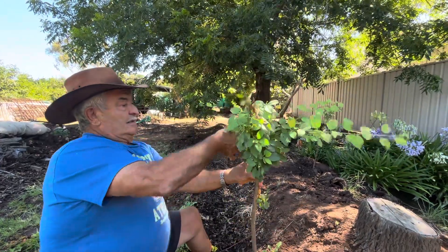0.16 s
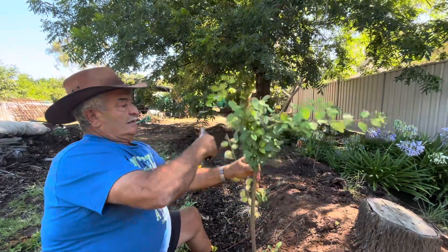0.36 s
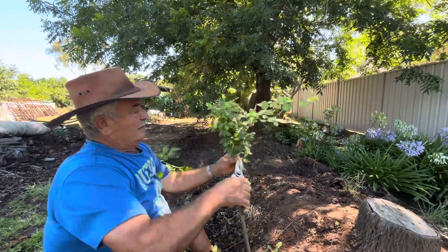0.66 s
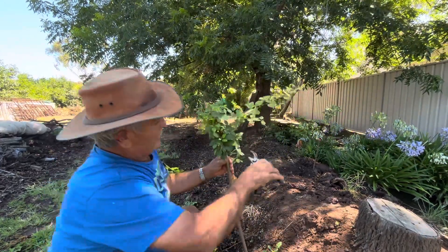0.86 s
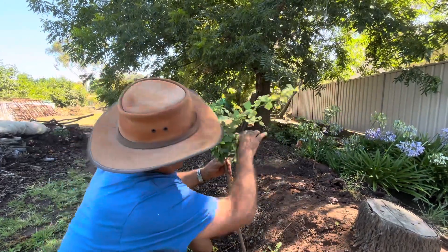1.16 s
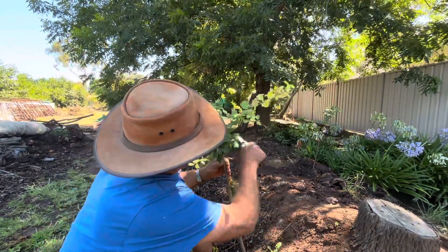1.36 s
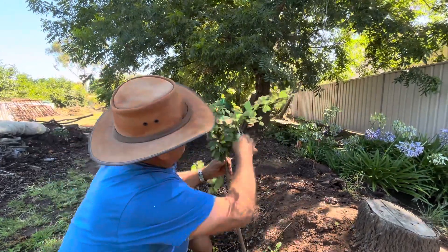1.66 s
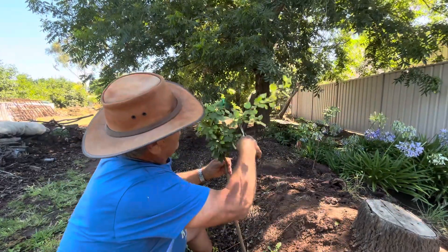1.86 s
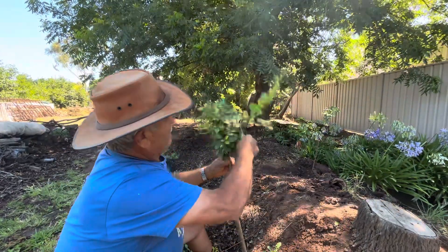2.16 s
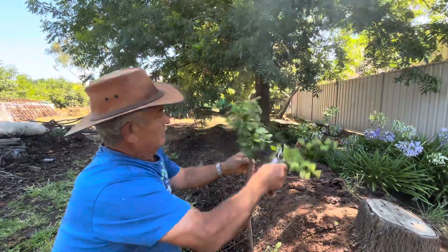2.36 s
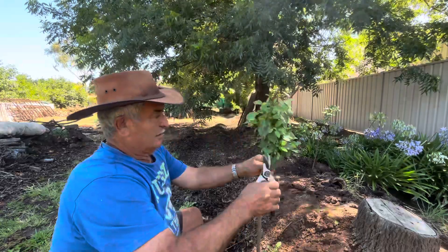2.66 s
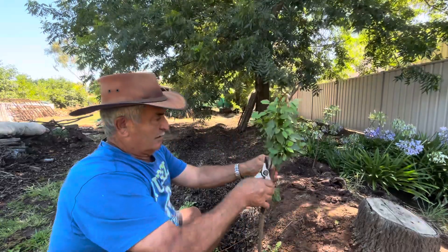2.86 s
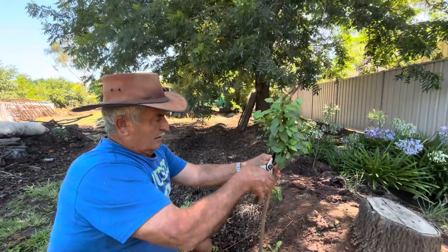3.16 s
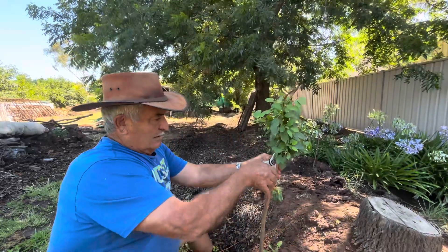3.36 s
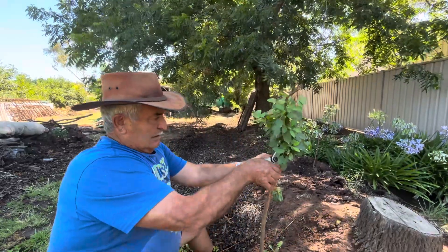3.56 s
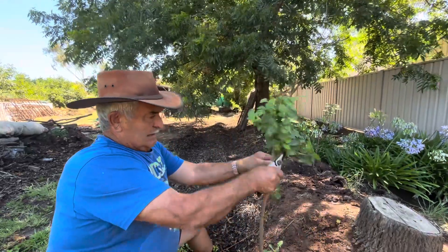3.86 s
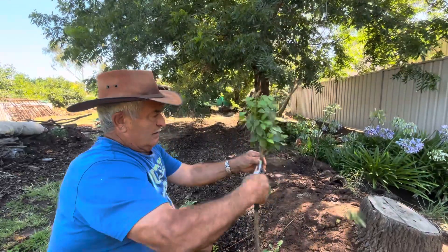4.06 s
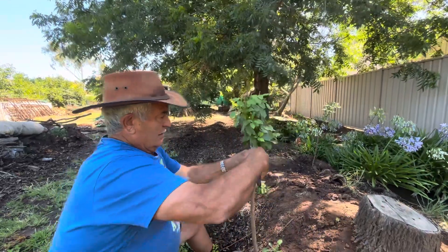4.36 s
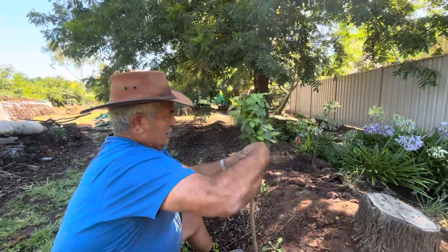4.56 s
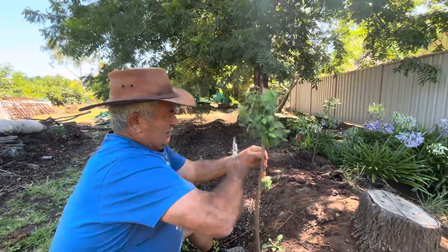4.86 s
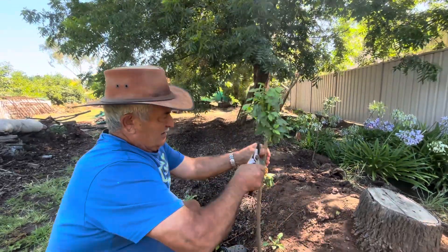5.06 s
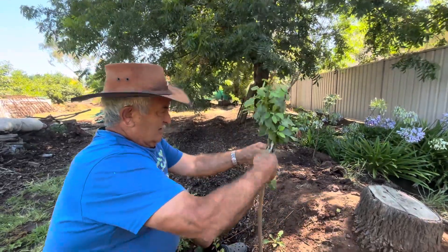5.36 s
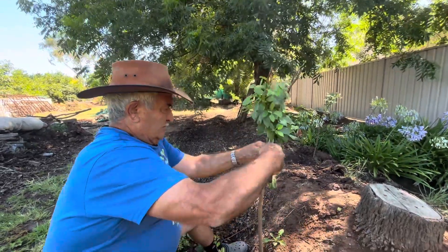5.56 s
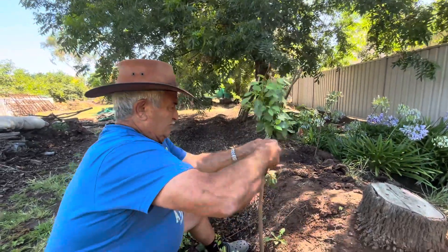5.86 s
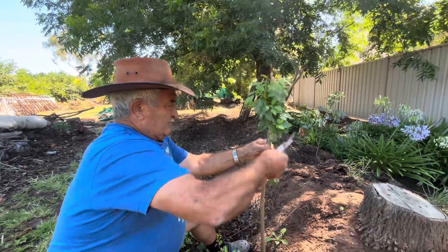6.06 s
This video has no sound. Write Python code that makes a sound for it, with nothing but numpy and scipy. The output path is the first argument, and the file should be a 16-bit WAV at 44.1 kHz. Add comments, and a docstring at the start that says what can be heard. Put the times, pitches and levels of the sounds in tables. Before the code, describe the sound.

In a breezy garden, a first sharp snip comes almost at once, a second a second later, a third near two seconds, then after a pause three more. Each is a tight cluster of metallic and stem cracks, brief and dry, with a faint fence reflection. Leaves swish and tick around them, low wind thuds and pops hit the nearby stereo camera, and a quiet cicada buzzes in the background.

```python
"""Snipping stems in a windy garden

Hand secateurs cut thin leafy stems, an arm's length or two from a small camera with two microphone ports.
Each snip is a run of short noise bursts that ring the steel and the stem; a metal fence and foliage answer.
Ticks are pitched crackles, and leaves rustle as hiss with tiny sparks.
A cicada pulses as a sliding tone in swells, and far trees and road hush as smooth noise.
Wind buffets the ports with low noise and single deep pops."""
import sys
import numpy as np
from scipy import signal
from scipy.fft import rfft, irfft, next_fast_len
from scipy.io import wavfile
from scipy.ndimage import uniform_filter1d, map_coordinates

SR = 44100
rng = np.random.default_rng(int(sys.argv[2]) if len(sys.argv) > 2 else 0)


def file_out(sig):
    """Save sig as 16-bit WAV at sys.argv[1]."""
    # one column per channel
    cols = np.atleast_2d(sig).T
    # limit, then scale
    lim = np.clip(cols, -1, 1)
    pcm = np.round(lim * 32767).astype(np.int16)
    wavfile.write(sys.argv[1], SR, pcm)


N = 273508

# In every pan_db column, a positive number means louder on the left.

# far trees and road, loudness over time: time_s, level_db
HUSH_LEVEL = [(0, -46.5), (.67, -43), (1.0, -44), (2.09, -45.5), (2.45, -47.5), (2.7, -46), (2.8, -40.5),
              (3.3, -43.5), (3.6, -44.5), (3.9, -47), (4.3, -42), (4.8, -45), (5.39, -42), (5.77, -42.5),
              (5.9, -48.5), (6.2, -44)]
# tone colour of the far hush: pitch_hz, relative_db
HUSH_SPECTRUM = [(150, -3.5), (250, -7.5), (393, -5.5), (452, -9), (566, -4.5), (875, -3.5), (1640, -8),
                 (3060, -19.5), (4730, -20.5), (5730, -17), (10000, -18.5), (11000, -27), (13600, -21),
                 (14600, -81), (16000, -70)]
# how alike the two sides of the hush are: pitch_hz, likeness (0 to 1)
HUSH_LIKENESS = [(300, 0.51), (700, 0), (8000, 0), (12000, 0.84)]

# cicada swells: start_s, hold_s, level_db
CICADA_SWELLS = [(0, 0.068, -50), (1.247, 0.373, -54), (3.1, 0.0287, -53), (3.19, .1, -53),
                 (4.939, 0.116, -62), (5.186, 0.13, -49.5), (5.86, 0.13, -61)]
SWELL_RISE_S, SWELL_FALL_S = .4, .2  # time to climb or drop 20 dB
BETWEEN_SWELLS_DB, FAR_CICADAS_DB = -64.5, -64
PULSES_PER_S = 51  # average
SHARPENS_HZ_PER_DB = 22  # louder singing is higher

# breeze across the ports: time_s, thud_db, flutter_db
BREEZE_LEVELS = [(0, -39, -59), (.15, -26, -56), (.4, -45, -67), (.53, -34, -63), (.8, -61, -64),
                 (.9, -38, -61), (1.2, -27, -55), (1.35, -32, -52), (1.6, -33, -43), (1.73, -22, -49),
                 (1.8, -25, -42), (1.95, -19, -52), (2.15, -18.5, -34), (2.4, -40, -52), (2.6, -32, -38),
                 (2.9, -34, -43), (3.1, -25, -36), (3.5, -27, -39), (3.9, -34, -45), (4.35, -24.5, -39),
                 (4.55, -30, -35), (4.9, -33, -33), (5.25, -27.5, -38), (5.75, -34.5, -45), (6.2, -39, -53)]
# gusts head-on: start_s, hold_s, thud_db, flutter_db
GUST_EVENTS = [(0, 0.26, -35, -54.5), (0.417, 0.59, -42, -57), (0.879, 0.088, -32.5, -59),
               (1.034, 0.027, -32.5, -51), (1.17, 0.093, -40, -53), (1.697, 0.24, -41, -53),
               (1.912, 0.083, -27.5, -36), (2.019, 0.036, -38, -37.5), (2.096, 0.069, -28, -33),
               (2.294, 0.015, -38, -40.5), (2.468, 0.04, -35.5, -32.5), (2.58, 0.039, -38, -41),
               (2.778, 0.12, -37, -61), (3.082, 0.015, -57, -37), (3.25, 0.037, -36.5, -46.5),
               (3.366, 0.039, -33, -35.5), (3.545, 0.035, -27.5, -35.5), (3.69, 0.018, -35.5, -43),
               (3.772, 0.025, -39, -44), (3.863, 0.24, -43, -47), (4.104, 0.048, -40.5, -38.5),
               (4.243, 0.18, -33, -31), (4.478, 0.0085, -29.5, -41), (4.585, 0.0057, -34, -37),
               (4.66, 0.026, -30.5, -38.5), (4.972, 0.0058, -38, -28.5), (5.075, 0.015, -35.5, -45),
               (5.203, 0.05, -37.5, -42.5), (5.315, 0.033, -35, -40.5), (5.441, 0.043, -34, -43.5),
               (5.53, 0.017, -36, -48), (5.812, 0.046, -30, -35.5), (6.036, 0.042, -34.5, -45),
               (6.136, 0.028, -31.5, -39)]
GUST_RISE_S, GUST_FALL_S = 0.049, 0.048  # time to climb or drop 20 dB
LULL_DB = (-45.5, -49.5)  # head-on thud and flutter between gusts
SIDEWAYS_DB = (0, 3)  # thud and flutter that a gust adds across the ports, over its head-on level
# tone colour of the low wind thud: pitch_hz, relative_db
THUD_SPECTRUM = [(15, -37), (30, -19.5), (50, 2.5), (80, 2), (130, -5.5), (220, -24.5), (500, -109)]
# tone colour of the quicker wind flutter: pitch_hz, relative_db
FLUTTER_SPECTRUM = [(60, -14), (120, 1), (170, 1.5), (300, -5), (450, -17), (650, -28.5), (1000, -63)]

# the bush stirring: time_s, level_db
RUSTLE_LEVEL = [(0, -79), (.4, -75), (1.1, -47.5), (1.8, -49.5), (2.3, -47), (2.7, -49.5), (3.3, -46.5),
                (3.7, -49), (4.0, -48.5), (4.3, -49), (4.9, -46.5), (5.05, -51), (6.2, -53)]
# branches swishing: start_s, hold_s, level_db
BRANCH_SWISHES = [(0.229, 0.044, -38), (0.6, 0.18, -46), (1.846, 0.018, -46.5), (2, 0.14, -43),
                  (2.758, 0.019, -37.5), (3.745, 0.077, -44.5), (4.312, .01, -48), (4.433, 0.051, -46),
                  (5.816, 0.067, -49.5)]
SWISH_RISE_S, SWISH_FALL_S = 0.11, 0.14  # time to climb or drop 20 dB
# tone colour of rubbing leaves and crackles: pitch_hz, relative_db
LEAF_SPECTRUM = [(470, -52), (800, -3), (1010, 4.5), (1860, 1), (3570, 1.5), (9890, 2.5), (13600, -11),
                 (14300, -28), (15000, -65)]

# cracks ringing the blades: peak_s, level_db, strongest_hz, rise_ms, t60_ms (time to fade 60 dB), pan_db
BLADE_CRACKS = [(0.236, -18, 4300, 0.56, 20, 3), (0.239, -24, 4300, .6, 23, 8),
                (0.2421, -6, 8050, 0.36, 6.4, 3), (0.243, -5.5, 11700, 0.43, 13, -1),
                (0.2466, -27, 8600, 0.74, 26, 0), (0.247, -20, 8600, 0.74, 30, -4),
                (1.2988, -29, 6710, 2, 18, 3), (1.3003, -19, 9270, .4, 20, 0), (1.304, -25, 7570, 1, 25, 5),
                (1.3087, -5, 11800, 0.22, 3.2, 4), (1.3087, -9, 6940, 0.19, 11, 2),
                (1.312, -10.5, 9100, 2.2, 11, -2), (1.3144, -20, 5770, .5, 16, 6),
                (1.319, -32, 9270, .6, 14, 2), (2.1837, -25, 7700, 5.1, 27, -3),
                (2.1873, -15.5, 7570, .4, 18, -2), (2.191, -15, 6710, .5, 12, 0),
                (2.1932, -9.5, 11800, .3, 12, 0), (2.1943, -6, 7700, 0.75, 7.8, 2),
                (2.1966, -11.5, 8800, 0.43, 14, -5), (2.1994, -18, 5740, .4, 23, 8),
                (2.2043, -35, 8670, 1, 17, 0), (3.831, -20, 7500, 4.4, 22, -1),
                (3.8338, -12, 7870, 0.76, 18, -7), (3.8352, -7, 6760, .4, 15, 2),
                (3.8379, -12, 8800, .4, 12, -7), (3.84, -14.5, 4184, 0.46, 16, 8),
                (3.8407, -25, 7870, .5, 12, 4), (3.843, -25, 5770, .5, 27, 6),
                (4.7232, -26, 9300, 9.5, 25, 3), (4.7258, -17, 6710, 3.4, 37, 2),
                (4.7293, -9.5, 9800, 1, 11, -5), (4.7325, -14, 7900, .4, 11, 0),
                (4.7325, -8.5, 4184, 0.62, 21, 2), (4.738, -28, 9270, 1, 12, 0),
                (5.8903, -17, 6710, 2.6, 20, 2), (5.8934, -6, 10200, 0.46, 7.5, -8.5),
                (5.8936, -10, 6710, .4, 9, -8), (5.8978, -14.5, 10090, .4, 12, 1),
                (5.8975, -15, 6600, .5, 23, 6), (5.903, -28, 6710, .6, 32, 7)]
# cracks ringing the stem and handles: peak_s, level_db, strongest_hz, rise_ms, t60_ms, pan_db
STEM_CRACKS = [(0.233, -29, 3540, 2, 20, -10), (0.2375, -20, 2080, 1.3, 27, -4),
               (0.2408, -16, 1480, 0.4, 16, -5), (0.244, -19, 1330, .5, 19, -4),
               (0.2465, -21, 1200, 0.5, 24, -8), (0.249, -17.5, 1480, 0.73, 8.6, 5),
               (0.2522, -18.5, 1480, 0.75, 9.2, -15), (1.2994, -25, 2050, .4, 20, -10),
               (1.3035, -29.5, 1480, 0.87, 22, -6), (1.306, -21.5, 1493, 0.7, 22, -1),
               (1.31, -18.5, 3540, 0.49, 29, 2), (1.3156, -19, 2520, .5, 15, -9),
               (1.3187, -19, 2860, 0.73, 14, -5), (1.3227, -35, 2890, 0.66, 14, -1),
               (2.178, -29.5, 1990, 4, 41, -7), (2.1876, -12, 1930, 1.4, 14, -9),
               (2.192, -12, 2050, 0.35, 11, 3), (2.1946, -11, 2020, 0.67, 24, -4),
               (2.1981, -13, 2000, 0.75, 8.7, 0), (2.196, -15, 3130, .5, 18, 3),
               (2.2005, -33, 2040, 0.57, 20, 2), (3.8265, -20, 2030, 4.4, 82, 0),
               (3.8333, -12, 1980, 2.2, 20, 0), (3.8367, -14, 2080, 0.43, 17, -16),
               (3.8392, -12.5, 2870, 0.39, 16, -6), (3.836, -22, 1480, 0.68, 20, -2),
               (3.8435, -20, 2860, .8, 34, 1), (4.72, -19.5, 2060, 5, 24, -9),
               (4.725, -12, 1980, 0.92, 20, -6), (4.7277, -8, 2510, 0.67, 17, -6),
               (4.7322, -5, 2080, 0.39, 8.5, -6), (4.733, -14, 1200, .6, 13, -9),
               (4.7357, -5.5, 2070, .5, 7.3, -2), (5.8918, -15, 1900, 4, 7.5, -10),
               (5.8957, -14.5, 1940, 0.96, 11, 13), (5.898, -12.5, 2530, 0.33, 25, 3),
               (5.8914, -16, 1200, 0.41, 8.1, 11), (5.8982, -16, 1480, .6, 20, 0),
               (5.9015, -21.5, 2030, 0.54, 25, -16)]
# ringing tones of the steel blades: pitch_hz, width_hz, relative_db
STEEL_MODES = [(4200, 170, 4), (5270, 190, 0), (5500, 380, -0.5), (6590, 610, 3), (7670, 580, -2),
               (7990, 350, 3), (8620, 650, 1), (9300, 390, 4.5), (10200, 380, -2.5), (10660, 1800, -12),
               (11500, 1600, -3.5), (12950, 1050, -3.5)]
# ringing tones of the stem and handles: pitch_hz, width_hz, relative_db
WOOD_MODES = [(480, 89, -13.5), (775, 2700, -23), (1110, 460, 1.5), (1523, 73, 5), (1850, 260, -5.5),
              (2110, 137, 1), (2647, 770, -0.5), (3010, 600, 3), (3550, 430, 0.5)]
STEEL_SCATTER_DB, WOOD_SCATTER_DB = 2, 2  # how much each ringing tone varies from crack to crack
SNAP_MS = 2.5  # height of the click at a burst's peak, times its rise in ms

# arm and bush shade the fence echo more or less: time_s, level_db
FENCE_LEVEL = [(.24, -32), (1.31, -13), (2.19, -25), (3.84, -30), (4.73, -23), (5.89, -27)]
FENCE_S = .022  # delay of the fence echo
# how long foliage echoes last: pitch_hz, t60_s
GARDEN_FADE = [(800, 0.011), (2100, 0.26), (5500, 0.31), (12000, 0.21)]

# twigs, leaves and cut ends ticking: peak_s, level_db, strongest_hz, crackle_db (over the ring),
# rise_ms, t60_ms, pan_db
TICK_EVENTS = [(0.581, -38, 9400, -4, 2, 47, 1), (0.628, -43, 2500, -7, 1.5, 25, 0),
               (0.647, -42, 8500, -4, 1.5, 30, 0), (0.676, -40, 8000, -2, 1, 25, 0),
               (0.772, -42, 6500, 2, 3, 30, 0), (0.784, -42, 6000, 3, 1, 25, 0),
               (0.7012, -41, 1920, 3, 2, 41, 7), (1.165, -39.5, 5920, -0.5, .6, 36, 5),
               (1.222, -39, 3400, 0, 1.5, 37, 7), (1.267, -40, 6070, 5.5, 2.8, 91, 1),
               (1.4455, -31.5, 3350, -4.5, .3, 46, 1), (1.8337, -34, 12060, -2, 0.54, 14, -4),
               (1.8382, -24.5, 3850, -3.5, .4, 17, 4), (1.8424, -24.5, 3700, -7, 1, 12, 2),
               (1.849, -39, 4500, -9, 2.2, 45, 3), (1.982, -37, 8160, -7, 1.5, 29, 6),
               (2.035, -35.5, 4400, 2, 0.51, 23, 2), (2.216, -26, 2540, -8, 1.1, 30, -2),
               (2.222, -31, 2830, -12, 1, 18, 6), (2.229, -28, 6260, -2, .3, 16, -4),
               (2.34, -32, 6200, -3, 0.51, 26, 0), (2.6895, -31.5, 9250, -20, .3, 20, 0),
               (2.7265, -33.5, 1930, 7.5, 2.5, 38, 1.5), (2.744, -33, 8950, -5, 1, 35, -5),
               (2.777, -35, 6040, -2, 1, 30, 7), (2.8115, -45, 1700, -12, .6, 26, 7),
               (2.8262, -41.5, 1670, 3, .6, 29, 6), (3.423, -35.5, 1480, 4, 0.67, 29, 8),
               (3.8535, -31, 2620, -9, 0.91, 23, 2), (3.862, -27, 4370, -11, 2.5, 60, 4),
               (3.9846, -50.5, 6550, 13.5, 2, 40, 1), (4.1973, -23, 9670, -15, 1.7, 40, -9),
               (4.2052, -31.5, 5130, -2, 2.5, 50, 2), (4.21, -37, 9200, 4, 1.8, 32, 9),
               (4.215, -40, 12000, 6, 3.1, 10, -3), (4.325, -19.5, 7450, 3.5, 1.2, 11, 6),
               (4.3289, -28, 8400, -1, 1.8, 55, -6), (4.433, -38, 11800, -3, 4, 81, 0),
               (4.442, -39.5, 6670, -5, 2.7, 58, -7), (4.481, -52, 3000, 1, 1.7, 24, 2),
               (4.52, -45, 4000, 7, 2, 30, 0), (4.572, -37.5, 1820, -0.5, 2.5, 34, 2),
               (4.7135, -34, 13200, -10, .4, 15, 2), (4.79, -44, 2300, -1, 2, 25, 2),
               (4.809, -38.5, 5000, 3, 1, 28, 0), (4.829, -38, 3500, 2, 1, 28, 2),
               (3.885, -43, 4400, -5, 1, 25, 0), (2.242, -38, 2200, 2, 1, 25, -2),
               (4.7437, -42, 2230, -6, 1.1, 22, 2), (4.7552, -22, 4270, -7, 0.87, 25, 4),
               (4.7692, -32, 4460, 0.5, 3.3, 64, 2), (4.928, -35, 2020, -6, 1.5, 27, 3),
               (5.014, -33.5, 2030, -0.5, 0.57, 47, 1), (4.961, -45, 7000, -4, 4, 37, 0),
               (5.077, -37.5, 6900, -2, 2, 30, -1), (5.257, -30, 1800, -3, 0.65, 24, 0),
               (5.337, -23, 7500, -1, 0.44, 31, 1.5), (5.348, -42, 8500, 9, .6, 50, 3),
               (5.4325, -36.5, 3400, -2, 0.55, 40, 4), (5.732, -28, 11700, -12, 0.22, 5, -5),
               (5.737, -40, 11000, -1, .6, 10, 0), (5.7515, -31, 3330, -15, 0.67, 29, 8.5),
               (5.756, -32.5, 3520, -9, 0.4, 23, -2), (5.7628, -38, 10800, -8, .4, 8, -2),
               (5.911, -29, 2500, -3, 1.5, 32, -3), (5.918, -26, 2280, -4, 2.3, 25, 3),
               (5.93, -35, 5860, -15, 1, 35, 10)]
TICK_WIDTH = 0.22  # width of each of a tick's two filter stages, over its pitch

# single eddies popping on the ports: peak_s, level_db, pitch_hz
POP_EVENTS = [(1.91, -36, 184), (1.98, -14.5, 190), (2.085, -21, 180), (2.1437, -13.5, 195),
              (2.4674, -17.5, 190), (2.5622, -21.5, 250), (2.7112, -28.5, 318), (2.791, -21, 149),
              (3.549, -36, 237), (3.6655, -30.5, 523), (3.699, -24, 285), (3.9864, -26.5, 234),
              (4.1017, -38, 252), (4.2416, -15.5, 235), (4.316, -17, 383), (4.352, -29, 487),
              (4.375, -21, 291), (4.409, -24, 316), (4.572, -24.5, 267), (4.639, -25, 413),
              (4.695, -19.5, 273), (4.945, -16, 424), (5.057, -16, 236), (5.488, -19, 179),
              (5.8184, -22, 241), (5.8945, -26, 340), (6.034, -21, 217), (6.129, -22, 187)]
POP_T60_MS, POP_PAN_DB = 16, 7.5

# the treble fades out at the top: pitch_hz, gain_db
TREBLE_END = [(13500, -0.5), (14500, 1), (16400, -17)]
TOP_HZ = 16480


def amp(db):
    """Turns decibels into a plain multiplier."""
    return 10 ** (np.asarray(db) / 20)


def unit(x):
    """Scales a sound to an average strength (rms) of 1."""
    return x / np.sqrt(np.mean(x ** 2) + 1e-20)


def along(points, hz):
    """Reads a curve of (Hz, value) points on a log pitch axis."""
    f, v = np.transpose(points)
    return np.interp(np.log(hz + 1), np.log(f + 1), v)


def curves(rows):
    """Gives one value per sample for each column after the time."""
    s, *cols = np.transpose(rows)
    return [np.interp(np.arange(N) / SR, s, c) for c in cols]


def wobble(rate):
    """A smooth random curve through rate random points a second."""
    points = rng.standard_normal(int(N * rate / SR) + 4)
    return map_coordinates(points, [np.arange(N) * rate / SR])


def filtered(x, response):
    """Filters x by a complex response that depends on frequency."""
    m = next_fast_len(x.shape[-1] + 4096)
    spectrum = rfft(x, m) * response(np.fft.rfftfreq(m, 1 / SR))
    return irfft(spectrum, m)[..., :x.shape[-1]]


def coloured(x, spectrum):
    """Shapes x by a tone colour table, then sets its rms to 1."""
    return unit(filtered(x, lambda hz: amp(along(spectrum, hz))))


def swells(starts, holds, levels_db, rise_s, fall_s):
    """Gain of events that climb 20 dB in rise_s, hold, and drop 20 dB in fall_s; powers add."""
    t = np.arange(0, N / SR + .001, .001)
    power = 0
    for s, hold, db in zip(starts, holds, levels_db):
        before = np.maximum(s - t, 0) / abs(rise_s)
        after = np.maximum(t - s - abs(hold), 0) / abs(fall_s)
        power = power + amp(db - 20 * (before + after)) ** 2
    return np.interp(np.arange(N) / SR, t, np.sqrt(power))


def modes(table, centre_hz, scatter_db, fall_db, most_db):
    """Resonances at new random strengths, weaker with squared octaves from centre_hz, by most_db at most."""
    hz, width, db = np.transpose(table)[:, :, None]
    loss_db = np.minimum(abs(fall_db) * np.log2(hz / centre_hz) ** 2, abs(most_db))
    gain = amp(db + scatter_db * rng.standard_normal(hz.shape) - loss_db)
    sign = (-1.) ** np.arange(len(table))[:, None]  # neighbours ring in opposite directions

    def response(f):
        return np.sum(sign * gain * 1j * f * width / (hz * hz - f * f + 1j * f * width), axis=0)
    return response


def burst(rise_ms, t60_ms, alike, grain_db, count=7):
    """Grainy noise swells to a click 20 ms in and dies; the left port hears the shared part count samples late."""
    ms = np.arange(4096) / SR * 1000 - 20
    rise = np.exp(np.minimum(ms, 0) / abs(rise_ms))
    shape = np.where(ms < 0, rise, amp(-60 * ms / abs(t60_ms)))
    grain = amp(grain_db * np.repeat(rng.standard_normal(256), 16))
    one, left, right = shape * grain * rng.standard_normal((3, len(ms)))
    share = np.clip(alike, 0, 1)
    shared = np.array([np.roll(one, count), one])
    sound = np.sqrt(share) * shared + np.sqrt(1 - share) * np.array([left, right])
    peak = np.argmax(shape)
    sound[[0, 1], [peak + count, peak]] += SNAP_MS / max(abs(rise_ms), .5)  # slow swells have little click
    return sound


def span(rise_ms, t60_ms):
    """Approximate rms of a burst whose envelope peaks at 1."""
    return np.sqrt((abs(rise_ms) + abs(t60_ms) / np.log(1000)) / 200)


def add(track, sound, s, pan_db):
    """Places a burst with its peak at s seconds, louder on the left if pan_db is positive."""
    start = round((s - .02) * SR)
    track[:, start:start + sound.shape[1]] += sound * amp([[pan_db / 2], [-pan_db / 2]])


def hush():
    """Far trees and road blend into smooth noise with faint patches in time and pitch."""
    level_db, = curves(HUSH_LEVEL)
    z = signal.stft(rng.standard_normal((2, N)), nperseg=512)[2]
    patches = uniform_filter1d(rng.standard_normal(z.shape[1:]), 6, 0)
    patches = uniform_filter1d(patches, 12, 1)
    pair = signal.istft(z * amp(1.5 * unit(patches)), nperseg=512)[1][:, :N]

    def mid_side_gains(hz):
        turn = np.arccos(np.clip(along(HUSH_LIKENESS, hz), -1, 1)) / 2
        return amp(along(HUSH_SPECTRUM, hz)) * [np.cos(turn), np.sin(turn)]
    mid, side = filtered(pair, mid_side_gains)
    both = unit(np.array([mid + side, mid - side]))
    return amp(level_db) * both * amp([[.8], [-.8]])  # the left is slightly louder


def cicada():
    """Each pulse is a tone sliding down near 5.7 kHz, with its octave, over narrow noise like blurred echoes."""
    swell = swells(*np.transpose(CICADA_SWELLS), SWELL_RISE_S, SWELL_FALL_S)
    level = np.hypot(amp(BETWEEN_SWELLS_DB), swell)
    beat = np.cumsum(PULSES_PER_S + 4 * wobble(3.5)) / SR % 1  # place within each pulse, 0 to 1
    gate = np.sin(np.pi * np.clip(beat / .85, 0, 1))
    sharpening = SHARPENS_HZ_PER_DB * 20 * np.log10(level / level.max())
    pitch_hz = 6050 + sharpening - 480 * beat + 80 * wobble(250)
    phase = 2 * np.pi * np.cumsum(pitch_hz) / SR
    flicker = amp(2 * wobble(60))
    octave = amp(-11) * np.sin(2 * phase)
    tones = np.array([np.sin(phase - lag) + octave for lag in (1.4, 0)])  # the left tone lags
    pulses = unit(gate * flicker * tones)
    blur = filtered(rng.standard_normal((2, N)), lambda hz: np.exp(-((hz - 5720) / 280) ** 2))
    far = filtered(rng.standard_normal((2, N)), lambda hz: np.exp(-((hz - 5620) / 110) ** 2))
    near = level * (pulses + amp(-5) * unit(blur))
    return near + amp(FAR_CICADAS_DB) * unit(far)  # others sing on, further off


def wind():
    """Eddies push one port as they pull the other; head-on gusts press both ports alike."""
    starts, holds, *levels_db = np.transpose(GUST_EVENTS)
    gusts = np.array([swells(starts, holds, db, GUST_RISE_S, GUST_FALL_S) for db in levels_db])
    head_on = np.hypot(gusts, amp(LULL_DB)[:, None])
    across = np.hypot(amp(curves(BREEZE_LEVELS)), gusts * amp(SIDEWAYS_DB)[:, None])
    pressed = buffet(*head_on, lumpy_db=1.5) * [[1], [1]]
    return pressed + buffet(*across, lumpy_db=4.0) * [[1.05], [-.95]]


def buffet(thud_gain, flutter_gain, lumpy_db):
    """Rough air makes a lumpy low thud and a quicker flutter above it."""
    lumps = amp(lumpy_db * wobble(16))
    thud = unit(lumps * coloured(rng.standard_normal(N), THUD_SPECTRUM))
    quick = amp(2.7 * wobble(35))
    flutter = unit(lumps * quick * coloured(rng.standard_normal(N), FLUTTER_SPECTRUM))
    return thud_gain * thud + flutter_gain * flutter


def rustle():
    """Leaves rub: a hiss, uneven at each port, with tiny clumped crackles."""
    swish = swells(*np.transpose(BRANCH_SWISHES), SWISH_RISE_S, SWISH_FALL_S)
    level = np.hypot(amp(curves(RUSTLE_LEVEL)[0]), swish)
    chance = 1200 / SR * amp(6 * wobble(30))  # of a spark at each sample, rising and falling in clumps
    sparks = (rng.random((2, N)) < chance) * rng.standard_normal((2, N))
    sparks = sparks * amp(2 * rng.exponential(1, (2, N)))
    hiss = rng.standard_normal((2, N)) * amp(1.8 * np.array([wobble(60), wobble(60)]))
    return level * coloured(unit(hiss) + .7 * unit(sparks), LEAF_SPECTRUM)


def snips():
    """Fibres give way in runs of cracks that ring the blades high and the stem and handles low."""
    track = np.zeros((2, N + SR))
    shade_db = 3  # the camera body shades the left port from treble
    for s, db, hz, rise_ms, t60_ms, pan_db in BLADE_CRACKS:
        crack = burst(rise_ms, t60_ms, alike=0.1, grain_db=0.5)
        steel = filtered(crack, modes(STEEL_MODES, hz, STEEL_SCATTER_DB, fall_db=90, most_db=10.5))
        add(track, span(rise_ms, t60_ms) * amp(db) * unit(steel), s, pan_db - shade_db)
    for s, db, hz, rise_ms, t60_ms, pan_db in STEM_CRACKS:
        crack = burst(rise_ms, t60_ms, alike=0.089, grain_db=3.5, count=20)
        wood = filtered(crack, modes(WOOD_MODES, hz, WOOD_SCATTER_DB, fall_db=71, most_db=14.5))
        add(track, span(rise_ms, t60_ms) * amp(db) * unit(wood), s, pan_db + 5.5)
    return track[:, :N]


def garden(x):
    """The fence returns one clear echo; foliage scatters a short noisy tail, drawn afresh for each half second."""
    block, out = SR // 2, np.zeros((2, N + 2 * SR))
    for start in range(0, N, block):
        hz, t, z = signal.stft(rng.standard_normal((2, SR // 4)), SR, nperseg=256)
        fade = amp(-60 * t / along(GARDEN_FADE, hz)[:, None])
        tail = signal.istft(z * fade, SR, nperseg=256)[1]
        steps = np.repeat(rng.standard_normal(SR // 40), 40)[:tail.shape[1]]
        tail = tail * amp(5 * steps)  # the tail is uneven, in short random steps of loudness
        tail = tail * np.where(np.arange(tail.shape[1]) < .019 * SR, amp(1.5), 1)  # the start is a bit stronger
        wet = signal.fftconvolve(x[:, start:start + block], tail / np.linalg.norm(tail[0]), axes=1)
        out[:, start:start + wet.shape[1]] += wet
    fence_db, = curves(FENCE_LEVEL)
    delayed = np.pad(amp(fence_db) * x, ((0, 0), (round(FENCE_S * SR), 0)))[:, :N]
    fence = delayed * amp([[-1.5], [1.5]])
    return amp(-14.0) * out[:, :N] + fence


def ticks():
    """Twigs, leaves and cut ends tick: each is a broad crackle with one stronger pitch."""
    track = np.zeros((2, N + SR))
    for s, db, hz, crackle_db, rise_ms, t60_ms, pan_db in TICK_EVENTS:
        puff = burst(rise_ms, t60_ms, alike=0.04, grain_db=5.5)
        ring = unit(filtered(puff, lambda f: (f * hz / (hz * hz - f * f + 1j * abs(TICK_WIDTH) * f * hz)) ** 2))
        crackle = coloured(puff, LEAF_SPECTRUM)
        tick = ring + amp(crackle_db) * crackle
        add(track, span(rise_ms, t60_ms) * amp(db) * tick, s, pan_db)
    return track[:, :N]


def pops():
    """Each eddy is a short low push with falling pitch, opposite at the two ports and weaker on the right."""
    track, t = np.zeros((2, N + SR)), np.arange(4096) / SR - .02
    rise = np.exp(np.minimum(t, 0) / .002)
    shape = np.where(t < 0, rise, amp(-60 * t / abs(POP_T60_MS / 1e3)))
    for s, db, hz in POP_EVENTS:
        push = shape * np.cos(2 * np.pi * hz * t * (1 - 6 * t) + rng.uniform(0, 2 * np.pi))
        add(track, amp(db) * push * [[1], [-.4]], s, POP_PAN_DB)
    return track[:, :N]


def scene():
    """Adds all the sounds; only the snips and ticks echo in the garden."""
    near = snips() + ticks()
    return near + garden(near) + rustle() + hush() + cicada() + wind() + pops()


def record(dry):
    """The treble fades out at the top, the loudest cracks clip softly; nothing stays above the band limit."""
    heard = filtered(dry, lambda hz: amp(along(TREBLE_END, hz)))
    clipped = heard / (1 + np.abs(heard / 1.05) ** 4) ** (1 / 4)
    return filtered(clipped, lambda hz: hz < TOP_HZ)


dry = scene()
out = record(dry)
file_out(out)
```